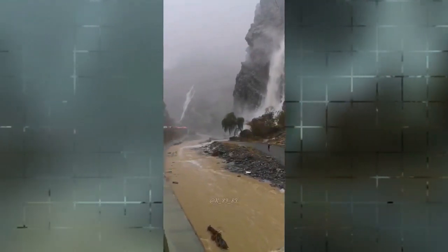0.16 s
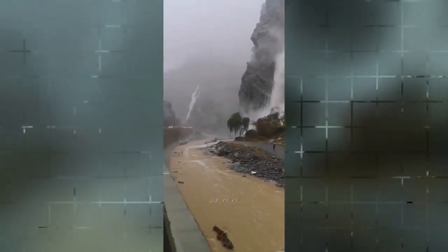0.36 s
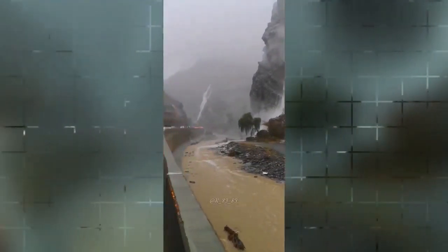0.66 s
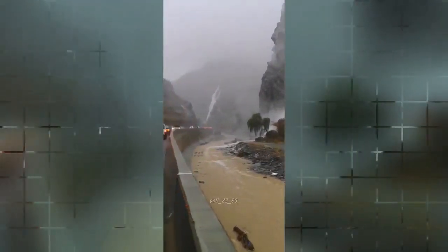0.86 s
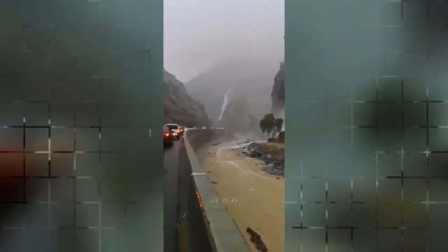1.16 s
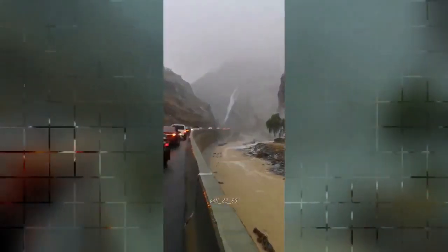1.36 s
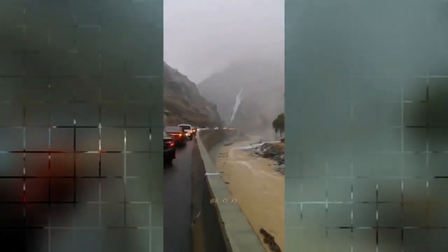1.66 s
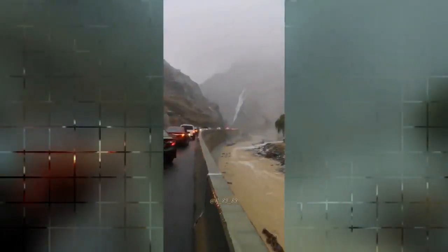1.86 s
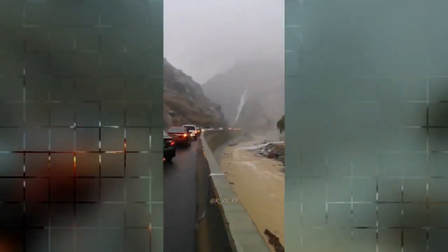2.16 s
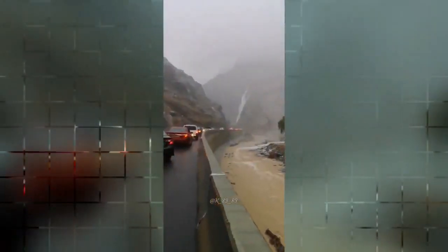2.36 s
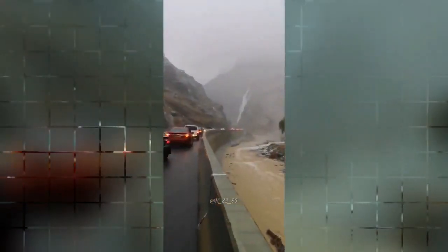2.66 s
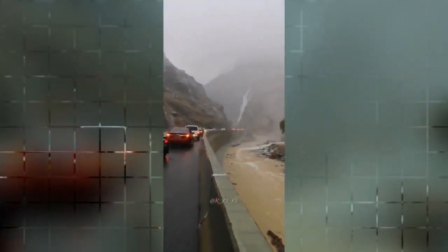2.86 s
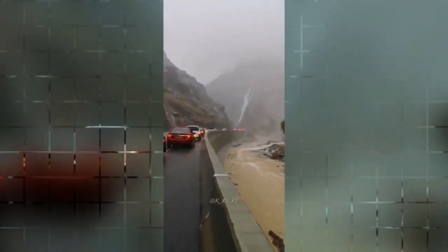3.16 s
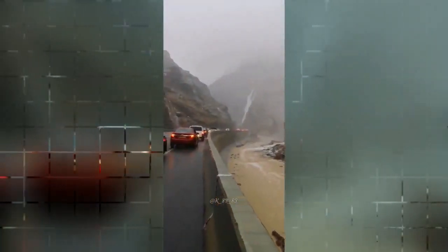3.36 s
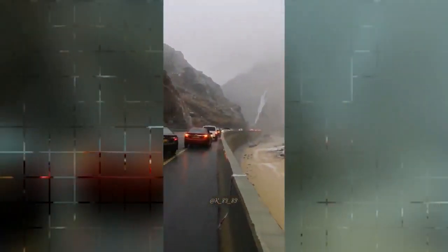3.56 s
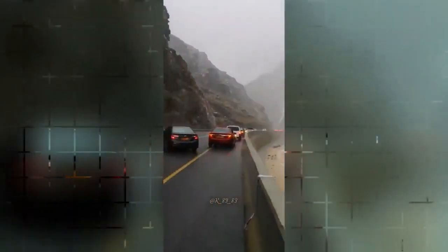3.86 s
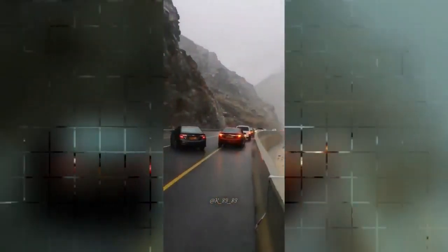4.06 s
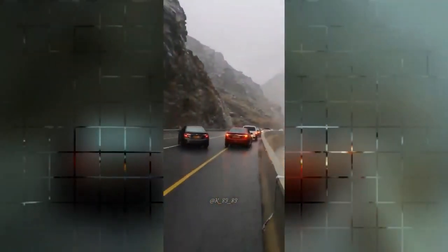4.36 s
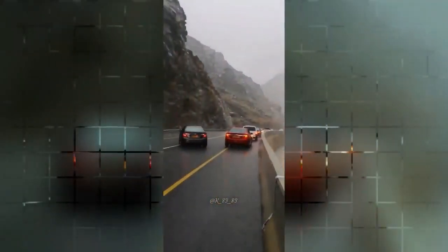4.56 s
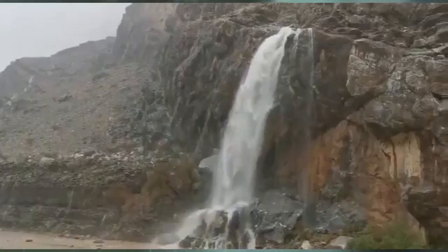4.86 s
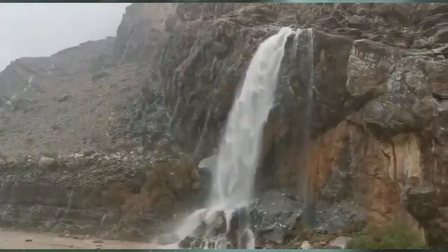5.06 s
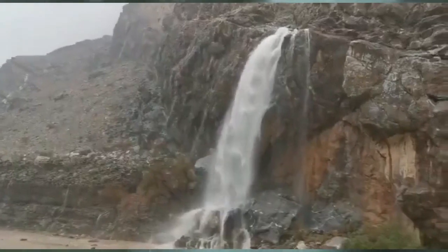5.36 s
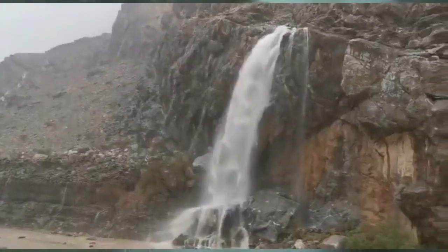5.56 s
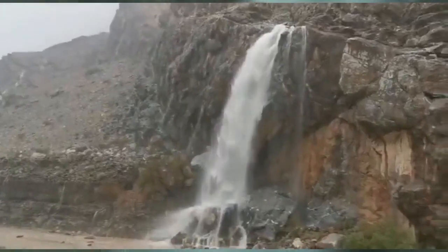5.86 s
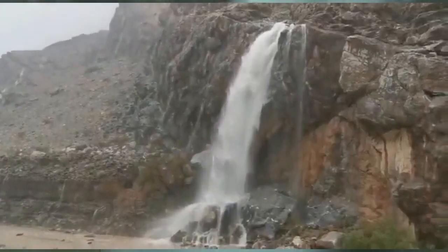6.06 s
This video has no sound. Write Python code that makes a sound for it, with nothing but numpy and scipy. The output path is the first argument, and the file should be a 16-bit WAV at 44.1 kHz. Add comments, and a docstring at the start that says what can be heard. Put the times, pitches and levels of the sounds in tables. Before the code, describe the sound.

Outdoors at a roadside, a steady wash of downpour and rushing river fills both sides, with low wind buffeting the microphone. A handful of raindrops knock on the microphone at the left, and a soft swish of wet tyres grows underneath. Everything stops abruptly. After a moment of silence, a slightly quieter waterfall pours into a pool, centred, with two soft low plops and a little wind rumble.

```python
"""Heavy rain on a mountain road beside a flooded river: countless splashes merge into roar and hiss.
Tyres swish on the wet road and wind rumbles on the hand-held stereo microphone. A few raindrops strike
its case by the left port, and each big one makes the limiter duck the wash. After a short silence,
a waterfall pours down a cliff and plops into its pool, heard in mono."""
import sys
import numpy as np
from scipy import signal
from scipy.fft import rfft, irfft
from scipy.io import wavfile
from scipy.ndimage import uniform_filter1d, minimum_filter1d

SR = 44100
rng = np.random.default_rng(int(sys.argv[2]) if len(sys.argv) > 2 else 0)


def persist_wave(psi):
    """Save psi, clipped to +-1, as 16-bit WAV."""
    counts = np.round(np.clip(psi, -1, 1) * 32767).astype(np.int16)
    wavfile.write(sys.argv[1], SR, np.atleast_2d(counts).T)


N = 273720
TIME = np.arange(N) / SR
BIN_HZ = np.maximum(np.arange(N // 2 + 1) * SR / N, 1)
RUMBLE_SPLIT_HZ = 162  # between the wind's deep rumble and its small, quick eddies


def from_db(db):
    """Decibels to gain."""
    return 10 ** (np.asarray(db) / 20)


def unit_rms(x):
    """Scale to an rms of 1."""
    return x / np.sqrt(np.mean(x ** 2) + 1e-20)


def in_time(rows):
    """Each column of a curve at every sample."""
    seconds, *columns = np.transpose(rows)
    return [np.interp(TIME, seconds, column) for column in columns]


def in_frequency(rows):
    """Each column of a spectrum at every bin."""
    hz, *columns = np.transpose(rows)
    return [np.interp(np.log(BIN_HZ), np.log(hz), column) for column in columns]


def coloured(x, colour):
    """Filter by rows of frequency in Hz and gain in dB."""
    return irfft(rfft(x) * from_db(in_frequency(colour)[0]), N)


def drift(rate_hz):
    """A slow random wander with an rms of 1."""
    return unit_rms(irfft(rfft(rng.standard_normal(N)) / (1 + (BIN_HZ / rate_hz) ** 2), N))


def click_at(start_s):
    """One unit click."""
    return 1. * (np.arange(N) == round(start_s * SR))


def ring(clicks, hz, t60_s):
    """Each click sets off a dying sine of its own height."""
    decay, step = from_db(-60 / (t60_s * SR)), 2 * np.pi * hz / SR
    return signal.lfilter([0, np.sin(step)], [1, -2 * decay * np.cos(step), decay ** 2], clicks + 1e-18)


def seething_noise(patchy_db):
    """Noise whose narrow bands swell and fade briefly, each by its own chance."""
    cells = signal.stft(rng.standard_normal(N), nperseg=1024)[2]
    swell = uniform_filter1d(rng.standard_normal(cells.shape), size=3, axis=0)
    swell = unit_rms(uniform_filter1d(swell, size=3, axis=1))
    return signal.istft(cells * from_db(patchy_db * swell), nperseg=1024)[1][:N]


def wind(gusts, colour, lumps_db, upper_share):
    """Eddies buffet the microphone in lumps; the upper rumble follows a share of each gust."""
    eddies = coloured(rng.standard_normal(N), colour)
    eddies /= np.sqrt(uniform_filter1d(eddies ** 2, size=SR // 12) + 1e-12)  # even out the level
    eddies = unit_rms(eddies * from_db(lumps_db * drift(22)))
    deep = irfft(rfft(eddies) / (1 + (BIN_HZ / RUMBLE_SPLIT_HZ) ** 4), N)
    gust_db, usual_db = in_time(gusts)[0], np.mean(np.array(gusts)[:, 1])
    upper_db = usual_db + upper_share * (gust_db - usual_db)
    return deep * from_db(gust_db) + (eddies - deep) * from_db(upper_db)


def puffs():
    """Single buffets on the ports: a smooth bump of air pressure between two shallow counter-swings."""
    # Each row: centre in seconds, peak pressure in full scale (negative sucks), width in seconds.
    buffets = [(1.958, .16, .0045), (1.969, -.26, .0045), (2.0114, -.32, .0045), (2.3395, -.22, .004),
               (3.4885, .25, .0042)]
    out = np.zeros(N)
    for centre_s, pressure, width_s in buffets:
        offset = (TIME - centre_s) / width_s
        out += pressure * (1 - offset ** 2) * np.exp(-.5 * offset ** 2)
    return out


def road_wind(apart_db, lag_s):
    """One long gust, then a steady breeze, meets the left port first; small eddies differ by port."""
    # Each row: time in seconds, rumble level in dB.
    gusts = [(0.05, -21.5), (.36, -26.5), (.47, -18), (.7, -22.5), (1.35, -19), (1.9, -18.5), (2.09, -22.5),
             (3.25, -28.5), (4.7, -30)]
    # The rumble's spectrum. Each row: frequency in Hz, relative level in dB.
    colour = [(8.8, -36.5), (15, -8.5), (40, 0.5), (61, -0.5), (137, -9), (231, -18.5), (265, -22.5),
              (400, -39.5), (520, -75), (880, -120)]
    shared, apart = [wind(gusts, colour, lumps_db=0.5, upper_share=0.35) for _ in range(2)]
    shared = shared + puffs()
    low_cut = signal.butter(1, RUMBLE_SPLIT_HZ, "high", fs=SR, output="sos")
    apart = from_db(apart_db) * signal.sosfilt(low_cut, apart)
    return np.array([shared + apart, np.interp(TIME - lag_s, TIME, shared) - apart])


def cliff_wind():
    """By the waterfall, a breeze on the microphone gusts once and eases."""
    # Each row: time in seconds, rumble level in dB.
    gusts = [(5.14, -29), (5.36, -29.5), (5.48, -25), (5.6, -29), (5.8, -30), (6.02, -35), (6.2, -36)]
    # The rumble's spectrum. Each row: frequency in Hz, relative level in dB.
    colour = [(8.8, -34), (15, -6), (32, 3.5), (100, 2), (197, -4.5), (233, -3.5), (445, -19), (550, -25),
              (720, -42), (1210, -120)]
    return wind(gusts, colour, lumps_db=2.5, upper_share=1.0)


def tyres(side_db):
    """Cars creep past on the wet road, squeezing water from under their treads."""
    # Each row: time in seconds, swish level in dB.
    traffic = [(0, -58), (2.6, -42), (3.35, -45.5), (3.9, -43), (4.33, -38.5), (4.5, -42.5), (4.7, -38.5)]
    # The swish's spectrum. Each row: frequency in Hz, relative level in dB.
    swish = [(300, -31), (700, -3.5), (1200, -2.5), (1600, 5.5), (1950, 4.5), (2200, -7.5), (2700, -4),
             (4000, -19), (9000, -48)]
    mid, side = [seething_noise(patchy_db=3.5) for _ in range(2)]
    ports = mid + from_db(side_db) * np.array([side, -side])
    return from_db(in_time(traffic)[0]) * unit_rms(coloured(ports, swish))


def microphone_case(knock, lifts_db):
    """The case colours a knock with resonances and hollows, and sheds deep bass and high treble."""
    # Each row: resonance in Hz, width in Hz.
    resonances = [(405, 65), (980, 170), (2050, 450)]
    # Each row: centre in Hz, width in Hz, gain in dB.
    hollows = [(660, 240, -4), (3800, 1700, -7)]
    peaks = [(hz, width_hz, db) for (hz, width_hz), db in zip(resonances, lifts_db)]
    for hz, width_hz, db in peaks + hollows:
        band = signal.lfilter(*signal.iirpeak(hz, hz / width_hz, fs=SR), knock + 1e-18)
        knock = knock + (from_db(db) - 1) * band
    return signal.sosfilt(signal.butter(2, (250, 7500), "band", fs=SR, output="sos"), knock)


def drops_on_case(far_lag_s, far_cut_hz, far_db):
    """Drops knock the case and ring the air in the left port; the right hears them late and dull."""
    # Each row: start in seconds, strength in dB, contact pitch in Hz (low for a soft blow), cycles of
    # the knock, port ring in dB, then lifts in dB of the case's low, middle and high resonance.
    drops = [(0.9426, -3.5, 335, 1.75, -30, 13.5, 0, 11), (1.4159, -15, 4000, 1.5, -15, 8, 4, 7),
             (1.4784, 6, 1460, 3.3, -4, 12.5, 4.5, 2), (1.7150, 10, 1500, .9, -7, 5, 0, 8),
             (1.9803, -1.5, 3000, 1.2, -14, 5, 0, 8), (2.3862, -3.5, 370, 1.7, -30, 10.5, 4, 4),
             (2.7388, 7, 350, 1.3, -21, 8, 8.5, 17.5), (3.7636, -9, 6500, 2.5, -5, 8, 4, 6)]
    near = np.zeros(N)
    for start_s, db, hz, cycles, port_db, *lifts_db in drops:
        click = click_at(start_s)
        knock = microphone_case(ring(click, hz, cycles / hz), lifts_db)
        port_air = ring(click, hz=7480, t60_s=0.0017)
        near += from_db(db) * knock - from_db(port_db) * port_air
    dull = signal.sosfilt(signal.butter(1, far_cut_hz, fs=SR, output="sos"), near)
    far = from_db(far_db) * np.interp(TIME - far_lag_s, TIME, dull)
    return np.array([near, far])


def splashes(per_s, spread_db, cycles):
    """Impacts of random size, each ringing briefly at one of 16 pitches."""
    pitches_hz = np.geomspace(600, 13000, 16)
    hits = rng.random(N) < per_s / SR
    pitch_index = rng.integers(0, len(pitches_hz), N)
    size_db = spread_db * np.minimum(rng.exponential(1, N), 4)
    clicks = hits * from_db(size_db) * rng.choice([-1, 1], N)
    rings = (hz * ring(clicks * (pitch_index == k), hz, cycles / hz) for k, hz in enumerate(pitches_hz))
    return unit_rms(sum(rings))


def water_spectrum(near_db, per_s, cycles, patchy_db):
    """Countless far splashes merge into a hiss, and those nearer the microphone stand out."""
    far = unit_rms(seething_noise(patchy_db))
    near = splashes(per_s, spread_db=3.0, cycles=cycles)
    return rfft(far + from_db(near_db) * near)


def surge(spectrum, roar_db, hiss_db, churn_db, flutter_db):
    """The roar below 3 kHz churns slowly; the spray above it can flutter fast."""
    low_share = 1 / (1 + (BIN_HZ / 3000) ** 8)
    roar = unit_rms(irfft(spectrum * low_share, N))
    hiss = unit_rms(irfft(spectrum * (1 - low_share), N))
    return (roar * from_db(roar_db + churn_db * drift(3.3))
            + hiss * from_db(hiss_db + flutter_db * drift(24)))


def plops():
    """At the foot of the fall, slugs of water plunge into the pool, each ringing low and briefly."""
    # Each row: start in seconds, level in dB, pitch in Hz.
    plunges = [(5.187, -25.5, 312), (5.828, -24, 320)]
    return sum(from_db(db) * ring(click_at(start_s), hz, t60_s=0.061) for start_s, db, hz in plunges)


def waterfall():
    """A column of water breaks on rocks into roar and spray that hold steady, then swell."""
    # Each row: time in seconds, roar in dB, spray in dB.
    flow = [(5.12, -39.5, -40.5), (5.85, -39, -41), (6.2, -37, -37.7)]
    # The falling water's spectrum. Each row: frequency in Hz, relative level in dB.
    colour = [(100, -13), (450, -5.5), (620, -2.5), (900, -5.5), (1300, -10), (1750, -7), (2220, -3.5),
              (2550, -8), (3250, -10), (4000, -7), (4500, -9.5), (5400, -6.5), (7000, -15.5), (8000, -28.5),
              (9300, -17.5), (10900, -12), (13200, -21.5), (14200, -42)]
    spectrum = water_spectrum(near_db=-9.5, per_s=3300, cycles=4.0, patchy_db=2.0)
    spectrum *= from_db(in_frequency(colour)[0])
    return surge(spectrum, *in_time(flow), churn_db=0.6, flutter_db=0.0)


def river_and_rain():
    """At the roadside, rain and river splash all around and reach the two ports partly alike."""
    # Each row: time in seconds, river roar in dB, rain hiss in dB.
    flood = [(0, -35, -36.5), (1.3, -36.5, -38.5), (2.15, -37.5, -38.5), (3.05, -36, -37),
             (4.7, -35.5, -35.5)]
    # The spectrum of both. Each row: frequency in Hz, relative level in dB, left minus right in dB.
    wash = [(100, -12, 10.5), (300, 0.5, -2), (447, -4.5, 0.5), (696, -4.5, -3.5), (1000, -3.5, 0),
            (1640, -3, -3), (2200, -1, 1.5), (3200, -5.5, 1.5), (4430, -7.5, 1.5), (6540, -7, 5),
            (7770, -2.5, 12), (9000, -10, 1), (10880, -16.5, 0), (15000, -20.5, 0)]
    # Between the ports. Each row: frequency in Hz, coherence from 0 to 1, left's lead in radians.
    likeness = [(250, .8, 0), (450, .25, -1.3), (800, .1, -2.8), (1050, .45, 0), (1550, .5, 0),
                (1900, .2, 1.4), (2400, .3, 3), (3500, .1, .6), (6000, .15, 0), (7700, .42, 0),
                (8700, .4, 0), (9200, .9, 0), (13000, .42, 0)]
    colour_db, balance_db = in_frequency(wash)
    alike, lead = in_frequency(likeness)
    left, other = [water_spectrum(near_db=-9, per_s=2500, cycles=8.7, patchy_db=3.0) for _ in range(2)]
    right = alike * np.exp(-1j * lead) * left + np.sqrt(1 - alike ** 2) * other
    pan = from_db(np.array([balance_db, -balance_db]) / 2)
    pan /= np.sqrt(np.mean(pan ** 2, axis=0))
    ports = np.array([left, right]) * from_db(colour_db) * pan
    return surge(ports, *in_time(flood), churn_db=1.02, flutter_db=0.6)


def scene():
    """The roadside in stereo, a short silence, then the waterfall in mono."""
    road_end_s, cliff_start_s = 4.718, 5.113
    road = river_and_rain() + tyres(side_db=-6.5) + road_wind(apart_db=-16.5, lag_s=0.00007)
    road += drops_on_case(far_lag_s=0.00052, far_cut_hz=230, far_db=1)
    cliff = waterfall() + plops() + cliff_wind()
    return road * (TIME < road_end_s) + cliff * (TIME > cliff_start_s)


def record(dry):
    """A limiter looks a millisecond ahead, catches the big drops and lets go slowly; the top is cut."""
    ceiling_db, release_db_per_s, cutoff_hz = -0.9, 30, 15200
    peak_db = 20 * np.log10(np.abs(dry).max(axis=0) + 1e-9)
    over_db = np.maximum(peak_db - ceiling_db, 0)
    held_db = np.maximum.accumulate(over_db + release_db_per_s * TIME) - release_db_per_s * TIME
    gain_db = uniform_filter1d(minimum_filter1d(-held_db, size=SR // 1000), size=SR // 1000)
    top_cut = signal.ellip(10, .1, 80, cutoff_hz, fs=SR, output="sos")
    return signal.sosfilt(top_cut, dry * from_db(gain_db))


dry = scene()
out = record(dry)
persist_wave(out)
```